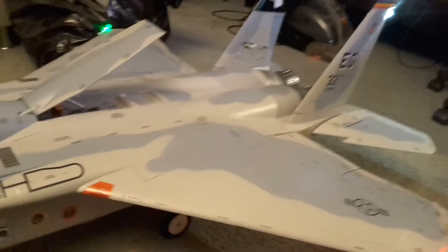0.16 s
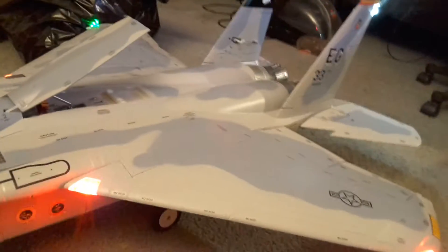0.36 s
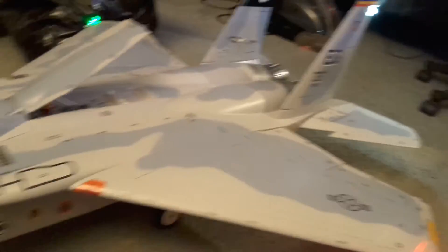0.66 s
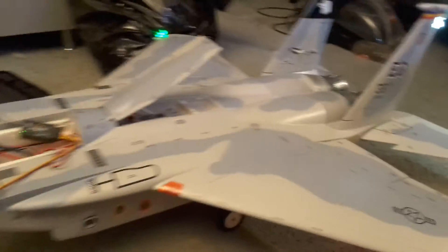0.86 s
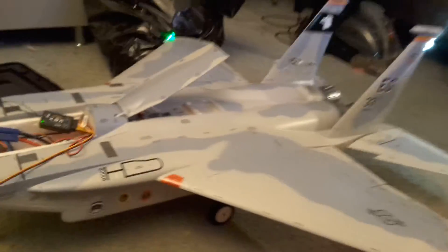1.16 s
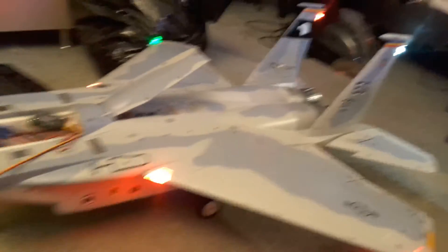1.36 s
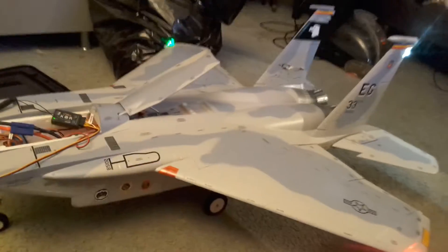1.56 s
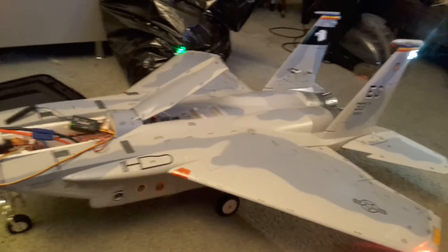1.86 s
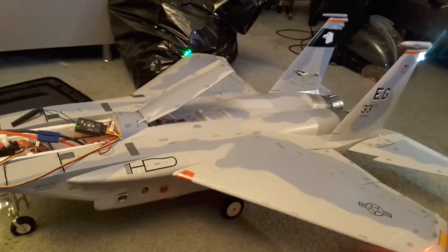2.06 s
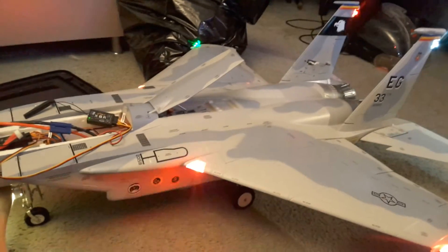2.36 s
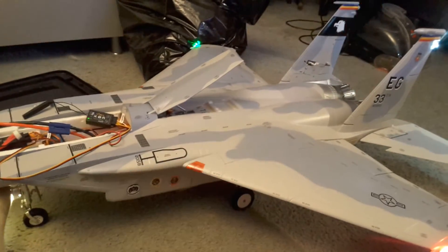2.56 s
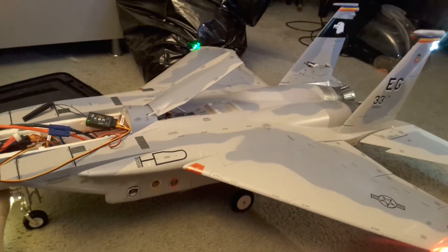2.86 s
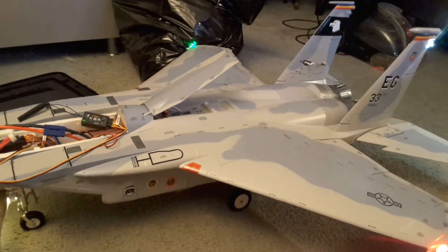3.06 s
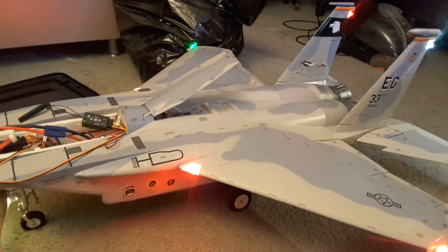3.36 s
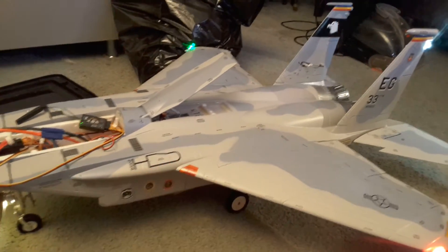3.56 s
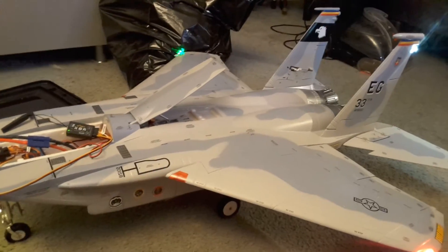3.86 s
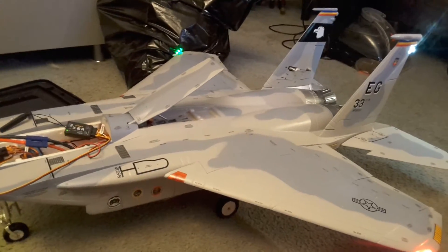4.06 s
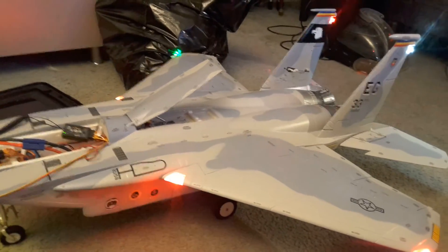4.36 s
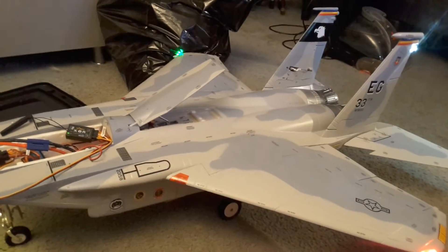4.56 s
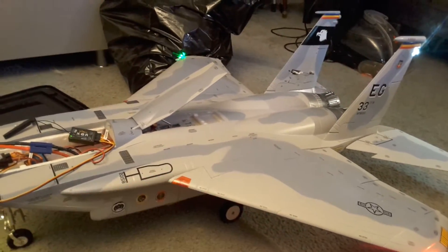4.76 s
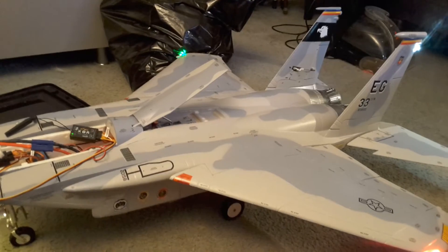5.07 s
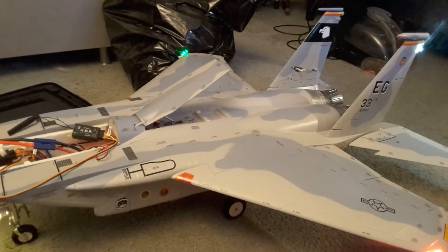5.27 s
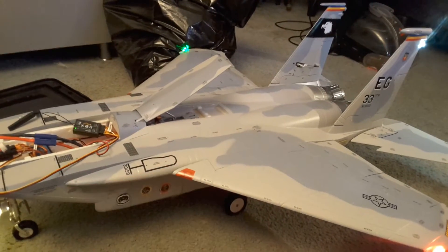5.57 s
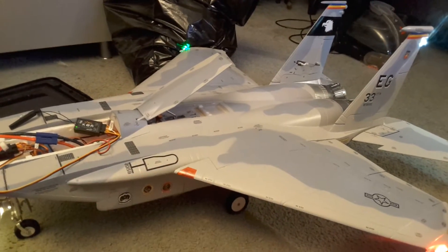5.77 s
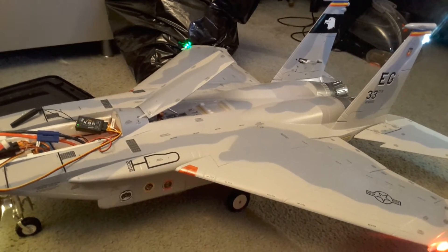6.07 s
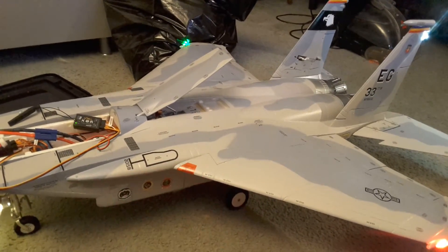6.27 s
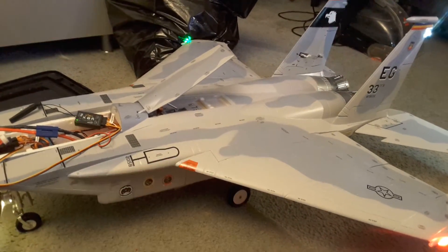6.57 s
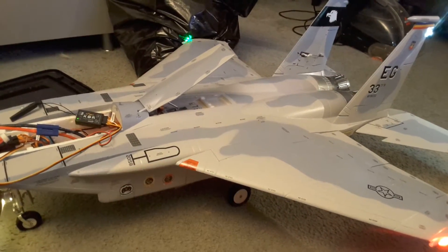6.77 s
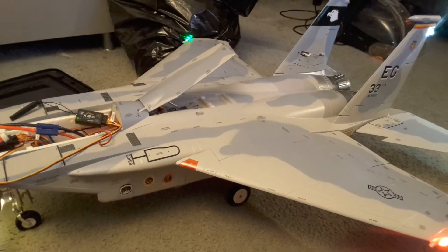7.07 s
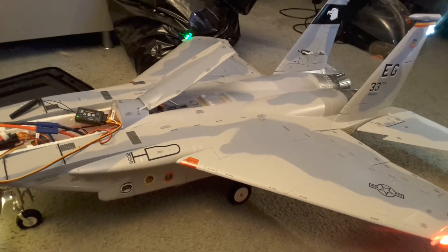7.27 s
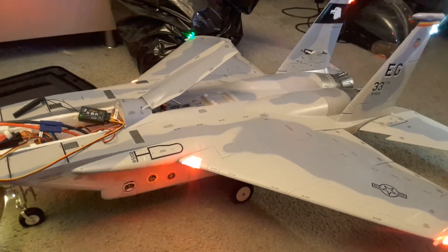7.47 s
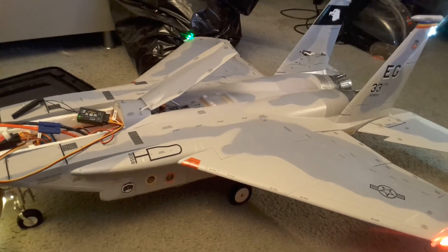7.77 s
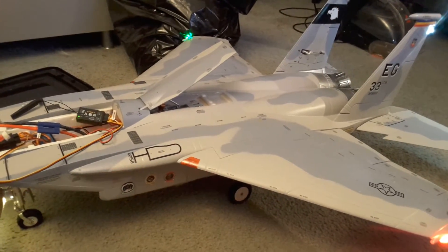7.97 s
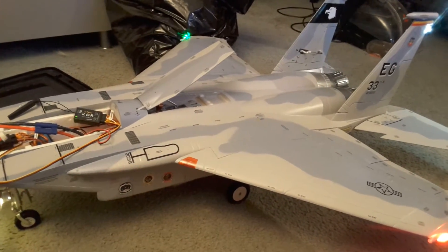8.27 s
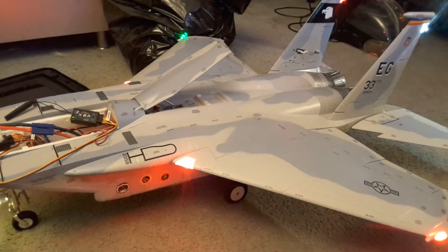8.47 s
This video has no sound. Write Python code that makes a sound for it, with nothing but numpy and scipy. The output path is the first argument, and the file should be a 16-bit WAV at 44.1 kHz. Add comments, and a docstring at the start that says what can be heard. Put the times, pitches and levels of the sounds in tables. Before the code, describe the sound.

Close by in a room, the electric fans of a model jet blow continuously with a bright hiss and a very high, steady whistle. Their whine sags once early on, then is throttled up step by step, with different tones swelling and fading as the pitch rises. The rushing air grows slightly louder and starts to howl, while the nearby moving microphone makes the whistle waver at first.

```python
"""A high whine over rushing air: a model jet's ducted fans run on a carpet indoors, throttled up in steps.
The fans sound harmonics of the shaft speed, each swelling as it passes through a duct resonance.
Turbulent flow gives rumble, rush and hiss, and at high flow the ducts howl. The speed controller
whistles at its fixed switching rate. A hand-held microphone moves nearby, through the whistle's
standing waves and away from the hollow note of the intakes; its left port favours the treble."""
import sys
import numpy as np
from scipy import signal
from scipy.fft import rfft, irfft, next_fast_len
from scipy.io import wavfile
from scipy.ndimage import uniform_filter1d, map_coordinates

SR = 44100
rng = np.random.default_rng(int(sys.argv[2]) if len(sys.argv) > 2 else 0)


def bounce(signal):
    """Save signal as a 16-bit WAV file at the path given by the first command-line argument."""
    frames = np.transpose(np.atleast_2d(signal))
    limited = np.clip(frames, -1, 1)
    pcm = np.round(limited * 32767).astype(np.int16)
    wavfile.write(sys.argv[1], SR, pcm)


N = 380583

# The throttle steps. Each row: time in seconds, shaft speed in turns per second.
SHAFT_SPEED = [(0, 143.6), (.28, 147), (.5, 147), (.7, 157), (.9, 160.9), (1.5, 159.9), (1.7, 145.9),
               (1.8, 141.8), (1.89, 141.6), (2.02, 163.5), (2.1, 171.8), (2.2, 173.2), (2.35, 173.3),
               (2.5, 174.7), (4.32, 174.55), (4.4, 176.2), (4.6, 185.4), (4.7, 187.7), (5.05, 187.8),
               (5.3, 192.4), (5.52, 200.8), (5.8, 200.3), (6.86, 199.9), (7, 208.5), (7.2, 216),
               (7.3, 221.2), (7.37, 222.3), (7.64, 222.2), (7.7, 220.9), (7.83, 222.6), (8.4, 222.3),
               (8.5, 224.9), (8.63, 227.8)]

# Spectra of five noise bands as heard; the hiss peaks at a microphone resonance near 8 kHz.
# Each row: frequency in Hz, relative density in dB.
DEEP_SPECTRUM = [(20, -34), (70, -30), (110, -22.5), (160, -10), (220, 3), (270, -4.5), (350, -35.5)]
RUMBLE_SPECTRUM = [(120, -57), (200, -15.5), (280, -4), (340, -0.5), (400, -2), (440, -6), (470, -26),
                   (600, -60)]
RUSH_SPECTRUM = [(120, -60), (300, -11), (430, -9), (480, -10.5), (540, -5), (1050, -9.5), (1300, -2),
                 (1600, -7), (2000, -4.5), (2600, -4.5), (3250, -6.5), (3500, -5), (4500, -10), (6200, -22),
                 (8000, -50)]
HISS_SPECTRUM = [(3000, -31), (5500, -25), (6500, -14), (7300, -7.5), (8100, 2.5), (9000, -5), (10200, -11),
                 (12000, -19), (15700, -25)]
SIZZLE_SPECTRUM = [(2500, -50), (4000, -5), (4800, 0), (5600, -1.5), (6500, -7), (7500, -38)]
# Resonances of ducts and fuselage, of the hollow note at the intakes and of the howl.
# Each row: centre in Hz, width in Hz, relative peak in dB.
BODY_MODES = [(404.2, 18.6, 6.5), (536, 55, 4), (681, 89, 6.5), (897, 150, 7.5), (1470, 65, -5.5),
              (1686, 63, 4.5), (1860, 77, 4), (2885, 87, 0.5), (3394, 49, 1.5), (3573, 76, 3)]
INTAKE_MODES = [(280, 61, 1), (506, 57, 2), (548, 31, 1.5), (630, 38, -1), (1290, 200, -11.5),
                (1860, 210, -7), (2860, 180, -7), (3450, 140, -13)]
HOWL_MODES = [(900, 83, -9.5), (1230, 71, -5), (2467, 33, 4), (2540, 73, -2), (2930, 45, 0),
              (2750, 430, -7)]
# A strong low end that drops abruptly. Each row: time in seconds, deep gain in dB, rumble gain in dB.
BASS_BOOST = [(0, 3.5, -0.5), (.7, 9, 0), (1.5, 10, 5), (1.75, 8.5, 2), (2.1, 10.5, 7), (3.38, 12.5, 3.5),
              (3.46, 1, -0.5), (8.63, 0, -0.5)]
# Slow drift of the air noise. Each row: time in seconds, rush gain in dB, hiss gain in dB.
AIR_DRIFT = [(0, 0, 2.5), (.6, 0.5, 3), (1.4, 0.5, 2), (1.8, -0.5, 0), (2.15, 1.5, 2.5), (3.4, -1, 0),
             (4.3, 1, 2.5), (4.7, 0, 1.5), (6.5, -0.5, 0.5), (6.9, -0.5, 0.5), (8.63, -0.5, 1)]
# Growth of the howl. Each row: shaft speed in turns per second, level in dB.
HOWL_LEVELS = [(144, -49), (175, -51), (188, -41), (205, -36.5), (222, -29)]

# The switching whistle along the microphone's path, and its upper sideband.
# Each row: time in seconds, level in dB.
WHISTLE_LEVELS = [(0.0, -20), (0.09, -21), (0.21, -17.5), (0.36, -20), (0.48, -28), (0.6, -25), (0.67, -18),
                  (0.77, -13.5), (0.81, -19), (0.91, -24), (0.94, -18), (0.98, -21.5), (1.1, -16),
                  (1.18, -17.5), (1.25, -31), (1.3, -19), (1.32, -19), (1.37, -28), (1.42, -15.5),
                  (1.46, -14), (1.51, -17), (1.75, -16), (2.09, -20.5), (2.43, -21.5), (2.6, -18.5),
                  (3.2, -15), (3.7, -14.5), (4.33, -20), (4.64, -17.5), (5.1, -18), (5.82, -14.5),
                  (8.51, -16), (8.63, -18)]
SIDEBAND_LEVELS = [(0, -54), (3, -56), (4, -48), (5, -45), (7, -52), (8.63, -51)]
# The multiples of the shaft speed that sound beside the whine.
HARMONIC_ORDERS = (1, 4, 6, 8, 11, 13, 14, 24, 36)
# Their swells. Each row: shaft speed in turns per second, then a level in dB for each order.
HARMONIC_LEVELS = [(144, -59, -49, -53, -57, -48, -47, -56, -48, -55),
                   (160, -57, -45, -46, -49, -45, -40, -54, -44, -54),
                   (173, -52, -50, -39, -46, -48, -48, -41, -43, -52),
                   (175, -57, -49, -41.5, -47, -52, -60, -49, -56, -52),
                   (188, -58, -53, -46, -49, -37, -46, -55, -45, -55),
                   (200, -66, -62, -52, -53, -39.5, -52, -64, -36, -58),
                   (209, -66, -62, -36, -64, -50, -62, -64, -44, -66),
                   (217, -66, -62, -31, -64, -56, -62, -64, -47, -66),
                   (221, -66, -62, -26, -64, -60, -62, -64, -48, -66),
                   (222.5, -66, -62, -32, -64, -60, -59, -64, -51, -66),
                   (225.5, -66, -62, -32, -64, -60, -54, -64, -51, -66),
                   (227, -66, -62, -32, -64, -60, -34, -64, -52, -66)]
# The whine. Each row: time in seconds, level in dB before interference with its echo.
WHINE_LEVELS = [(0, -38), (.5, -42), (.95, -33), (1.1, -44), (1.55, -45), (1.8, -34), (1.9, -42),
                (2.1, -31.5), (2.65, -28), (2.85, -31), (3.3, -30.5), (3.9, -35), (4.36, -27), (4.52, -30),
                (4.66, -23), (4.85, -28), (5.4, -31), (5.6, -38.5), (6.4, -40.5), (7, -33.5), (7.3, -27),
                (8.4, -27.5), (8.63, -26.5)]
# Imbalance of the microphone. Each row: frequency in Hz, left port over right port in dB.
PORT_BALANCE = [(1500, 0), (1900, 0.95), (2150, 3.5), (4000, 3), (5300, 5.5), (6900, 11), (7700, 13.5),
                (8400, 12), (9500, 7.5), (10200, 2), (10400, 0)]

CRUISE_SPEED = 180  # turns per second
# Each pair: level in dB at cruise speed, change in dB per tenfold speed.
DEEP_LAW, RUMBLE_LAW = (-51.5, -15), (-37.5, 21)
RUSH_LAW, HISS_LAW, SIZZLE_LAW = (-28, 28.3), (-29, 44.4), (-39.5, 50)
SWITCH_HZ, WHINE_ORDER = 8008.8, 12
ECHO_DELAY_S, ECHO_GAIN = .026767, -.58
LOW_CUT_HZ, TOP_HZ = 83, 15725


def amp(db):
    """Amplitude grows tenfold with every 20 dB."""
    return 10 ** (np.asarray(db) / 20)


def unit(x):
    """Normalisation to an rms of 1."""
    return x / np.sqrt(np.mean(x ** 2) + 1e-20)


def gain_at(spectrum, f):
    """Amplitude response, interpolated in dB on a logarithmic frequency axis."""
    hz, db = np.transpose(spectrum)
    return amp(np.interp(np.log(f + 1), np.log(hz + 1), db))


def curves(rows):
    """Linear interpolation in time: one value per sample for each column after the first."""
    seconds, *columns = np.transpose(rows)
    return [np.interp(np.arange(N) / SR, seconds, column) for column in columns]


def wobble(knots_per_s):
    """Slow random modulation: a spline through Gaussian knots."""
    coarse = np.arange(0, N + 64, 64)
    knots = rng.standard_normal(int(N * knots_per_s / SR) + 4)
    return np.interp(np.arange(N), coarse, map_coordinates(knots, [coarse * knots_per_s / SR]))


def filtered(x, response):
    """Linear filtering multiplies the spectrum by a frequency response."""
    size = next_fast_len(N + SR // 2)
    return irfft(rfft(x, size) * response(np.fft.rfftfreq(size, 1 / SR)), size)[..., :N]


def resonance_power(modes, f):
    """Each resonance is a peak about its centre frequency; their powers add."""
    return sum(amp(2 * db) / (1 + (2 * (f - hz) / width) ** 2) ** 2 for hz, width, db in modes)


def tone(cycles, db, flutter_db, jitter_rad):
    """A sine with random amplitude and phase modulation about a given rms level."""
    phase = 2 * np.pi * (cycles + rng.random()) + jitter_rad * wobble(25)
    return np.sqrt(2) * amp(db + flutter_db * wobble(14)) * np.sin(phase)


def turbulence(response, patchy_db=.69):
    """Turbulence is noise whose strength varies in patches of time and frequency; its rms is 1."""
    spectra = signal.stft(rng.standard_normal(N), nperseg=512)[2]
    patches = uniform_filter1d(rng.standard_normal(spectra.shape), size=6, axis=0)
    patches = uniform_filter1d(patches, size=14, axis=1)
    noise = signal.istft(spectra * amp(patchy_db * unit(patches)), nperseg=512)[1][:N]
    return unit(filtered(noise, response))


def flow_band(speed, spectrum, law, modes=()):
    """Flow noise follows a power law of speed; resonances, if given, lift parts of its spectrum."""
    cruise_db, slope_db = law
    noise = turbulence(lambda f: gain_at(spectrum, f) * np.sqrt(1 + resonance_power(modes, f)))
    return amp(cruise_db + slope_db * np.log10(speed / CRUISE_SPEED)) * noise


def airflow(speed):
    """Broadband flow noise as the microphone hears it; all bands but the deepest grow with speed."""
    deep_db, rumble_db = curves(BASS_BOOST)
    rush_db, hiss_db = curves(AIR_DRIFT)
    deep = amp(deep_db) * flow_band(speed, DEEP_SPECTRUM, DEEP_LAW)
    rumble = amp(rumble_db) * flow_band(speed, RUMBLE_SPECTRUM, RUMBLE_LAW, BODY_MODES)
    rush = amp(rush_db) * flow_band(speed, RUSH_SPECTRUM, RUSH_LAW, BODY_MODES)
    hiss = amp(hiss_db) * flow_band(speed, HISS_SPECTRUM, HISS_LAW)
    sizzle = flow_band(speed, SIZZLE_SPECTRUM, SIZZLE_LAW)
    return deep + rumble + rush + hiss + sizzle


def intake_note(near_db=-32, far_db=-50.5, leaves_s=1.19, away_s=1.75):
    """Resonance gives a hollow note near the intakes, which fades as the microphone leaves."""
    level_db, = curves([(leaves_s, near_db), (away_s, far_db)])
    return amp(level_db) * turbulence(lambda f: np.sqrt(resonance_power(INTAKE_MODES, f)))


def duct_howl(speed):
    """Duct resonances, excited by turbulence, howl at high flow."""
    level_db = np.interp(speed, *np.transpose(HOWL_LEVELS))
    return amp(level_db) * turbulence(lambda f: np.sqrt(resonance_power(HOWL_MODES, f)))


def controller_whistle(turns):
    """The switching tone fades in and out across standing waves; its sum tone with the whine is above."""
    cycles = SWITCH_HZ * np.arange(N) / SR
    whistle_db, = curves(WHISTLE_LEVELS)
    sideband_db, = curves(SIDEBAND_LEVELS)
    whistle = tone(cycles, whistle_db, flutter_db=.3, jitter_rad=.04)
    sideband = tone(cycles + WHINE_ORDER * turns, sideband_db, flutter_db=3, jitter_rad=.6)
    return whistle + sideband


def shaft_harmonics(speed, turns):
    """Harmonics swell at duct resonances; turbulence shakes the phase more the higher the order."""
    speeds, *levels = np.transpose(HARMONIC_LEVELS)
    return sum(tone(order * turns, np.interp(speed, speeds, db),
                    flutter_db=1.9, jitter_rad=.12 + .03 * order)
               for order, db in zip(HARMONIC_ORDERS, levels))


def fan_whine(speed, turns):
    """Interference with a late, inverted echo weakens the whine at evenly spaced pitches."""
    pitch_hz = WHINE_ORDER * speed
    comb = np.abs(1 + ECHO_GAIN * np.exp(2j * np.pi * pitch_hz * ECHO_DELAY_S))
    level_db, = curves(WHINE_LEVELS)
    return comb * tone(WHINE_ORDER * turns, level_db, flutter_db=1.6, jitter_rad=.3)


def scene():
    """Tones and air noise superpose in one sound field that reaches both ports."""
    speed, = curves(SHAFT_SPEED)
    turns = np.cumsum(speed) / SR
    tones = fan_whine(speed, turns) + shaft_harmonics(speed, turns) + controller_whistle(turns)
    air = airflow(speed) + intake_note() + duct_howl(speed)
    return np.tile(tones + air, (2, 1))


def record(dry):
    """The two ports act as band-pass filters, and the left takes the larger share of the treble."""
    def response(f):
        left_over_right = gain_at(PORT_BALANCE, f)
        shares = 2 / (1 + np.array([1 / left_over_right, left_over_right]))
        low_cut = f / np.hypot(f, LOW_CUT_HZ)
        return shares * low_cut * (f < TOP_HZ)
    return filtered(dry, response)


dry = scene()
out = record(dry)
bounce(out)
```